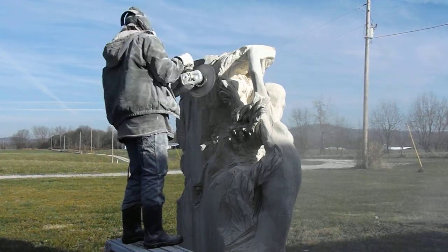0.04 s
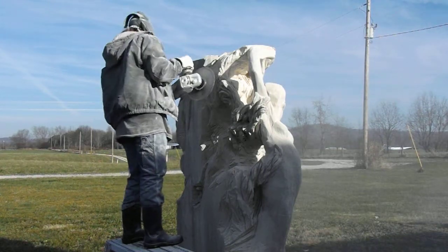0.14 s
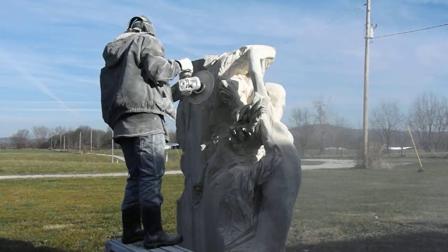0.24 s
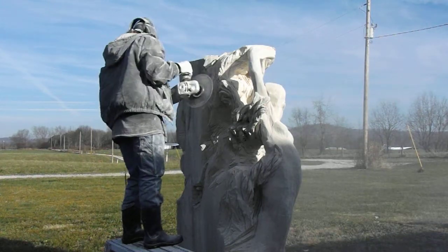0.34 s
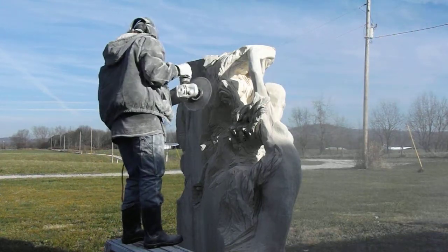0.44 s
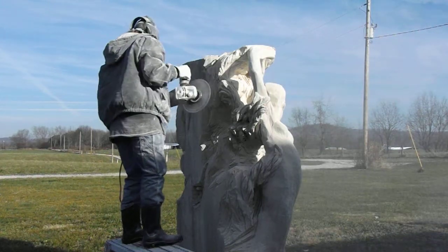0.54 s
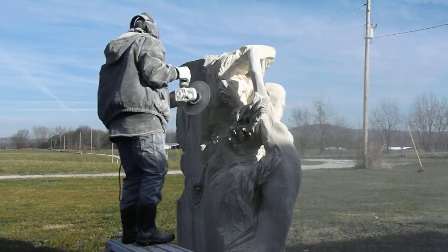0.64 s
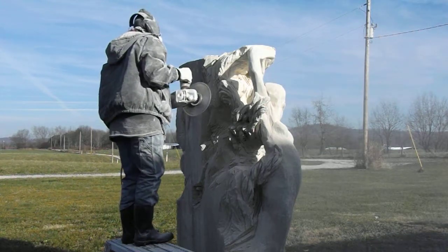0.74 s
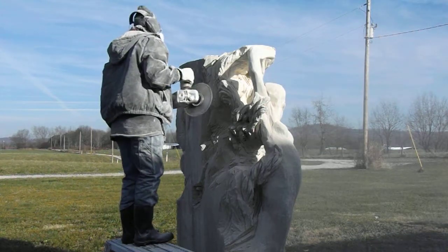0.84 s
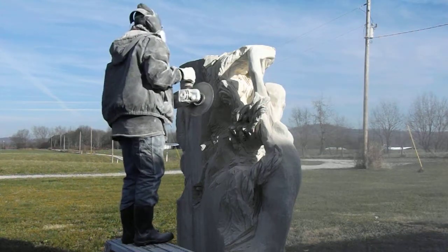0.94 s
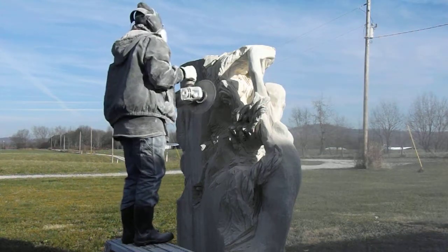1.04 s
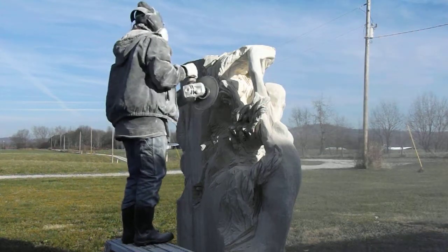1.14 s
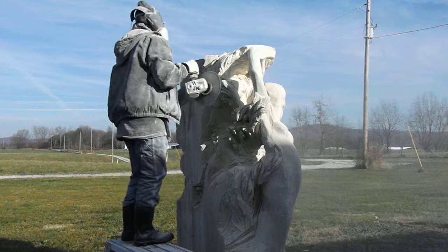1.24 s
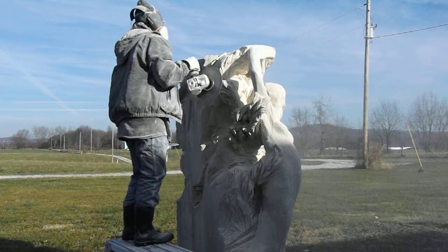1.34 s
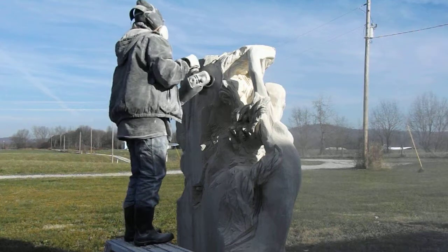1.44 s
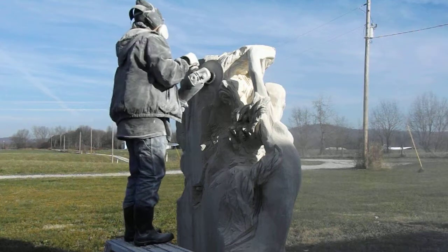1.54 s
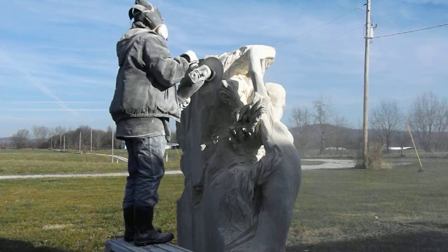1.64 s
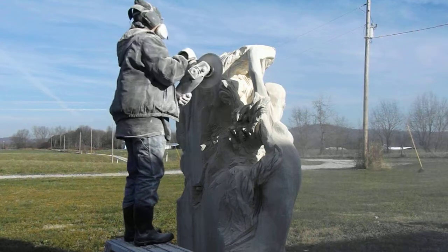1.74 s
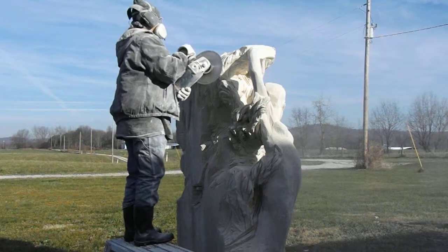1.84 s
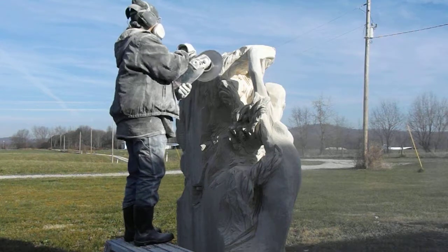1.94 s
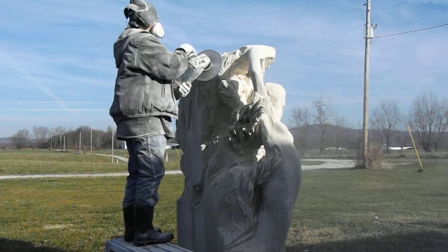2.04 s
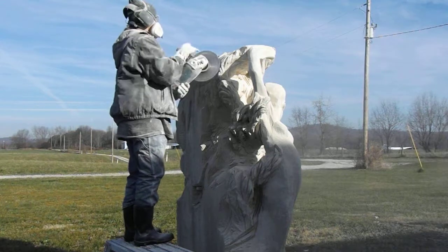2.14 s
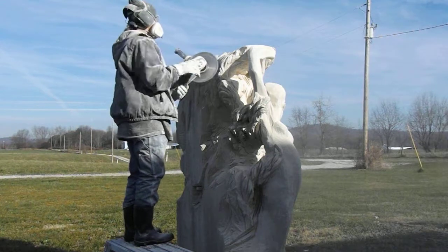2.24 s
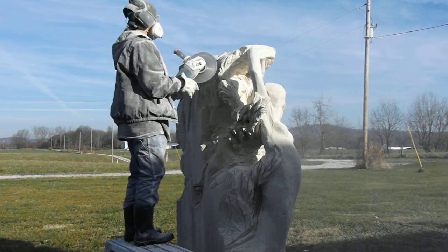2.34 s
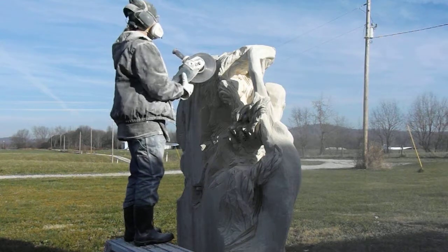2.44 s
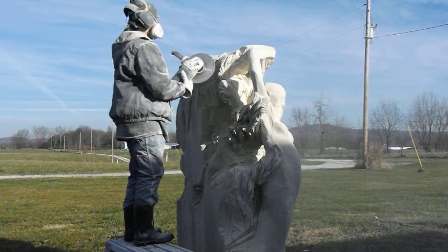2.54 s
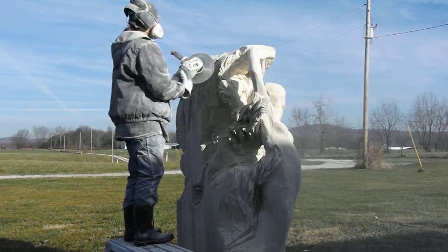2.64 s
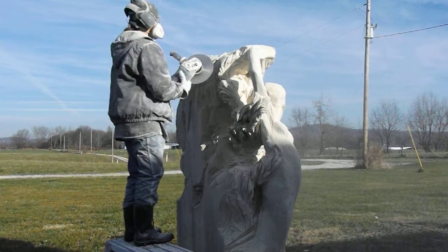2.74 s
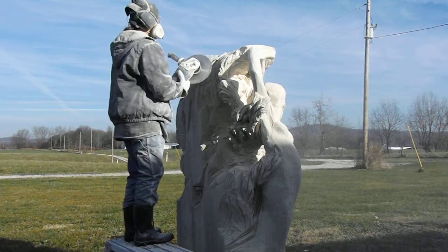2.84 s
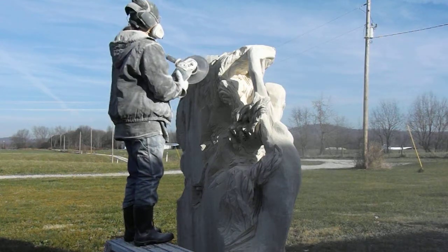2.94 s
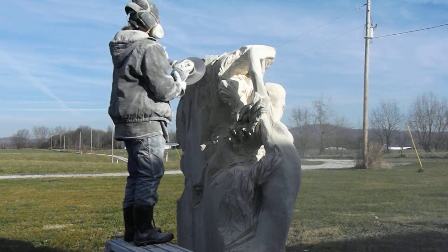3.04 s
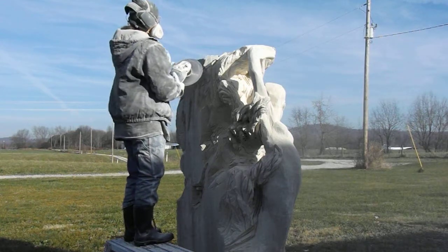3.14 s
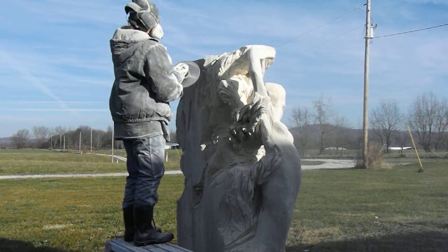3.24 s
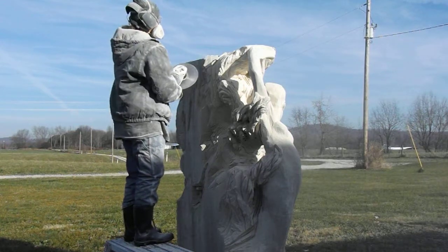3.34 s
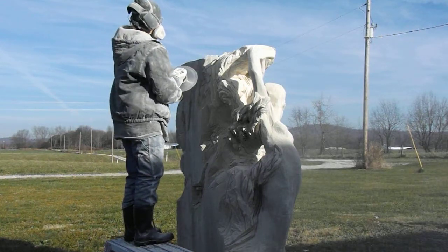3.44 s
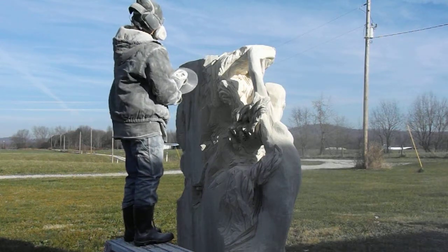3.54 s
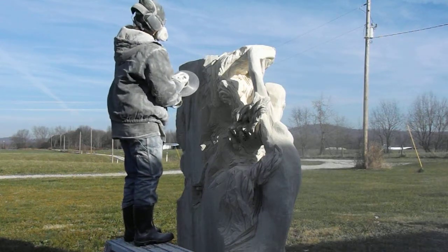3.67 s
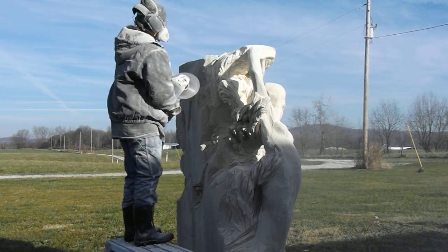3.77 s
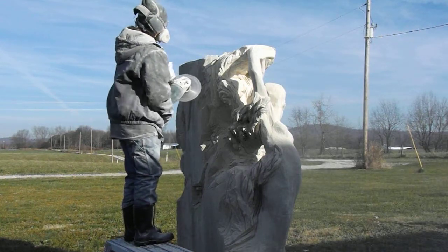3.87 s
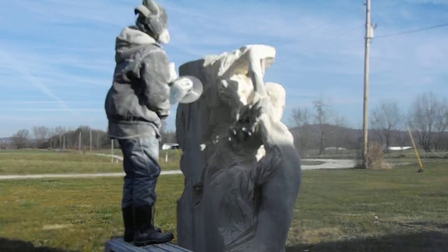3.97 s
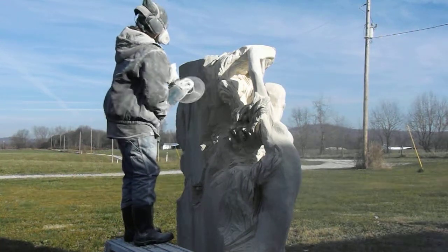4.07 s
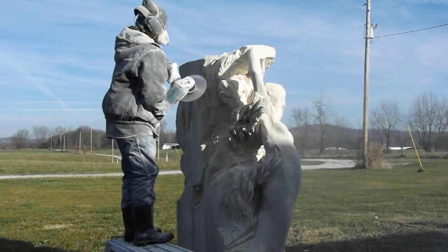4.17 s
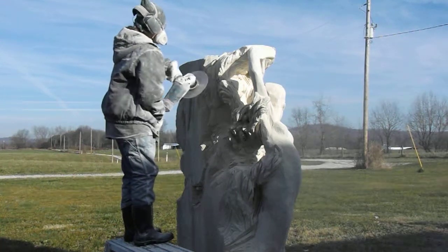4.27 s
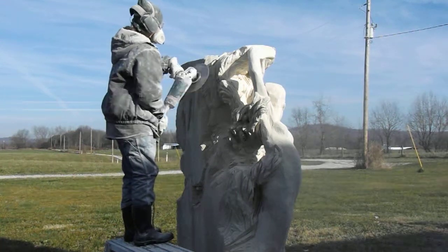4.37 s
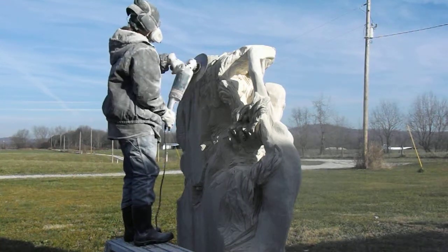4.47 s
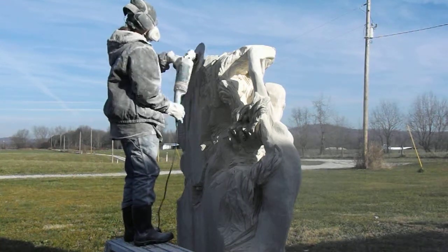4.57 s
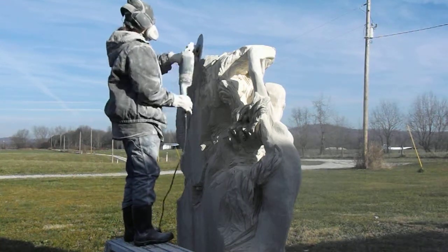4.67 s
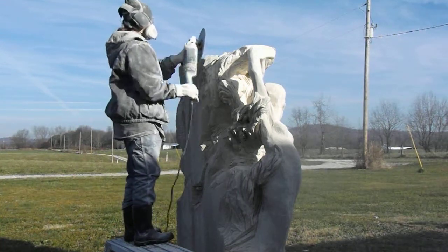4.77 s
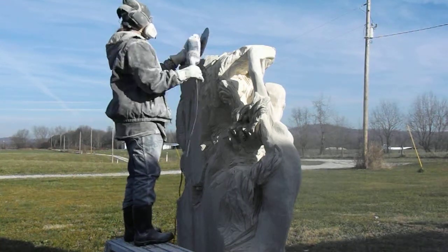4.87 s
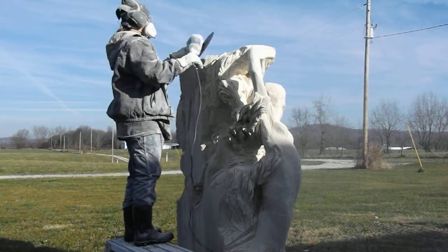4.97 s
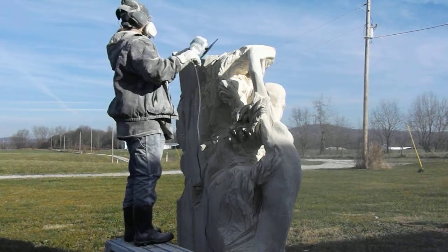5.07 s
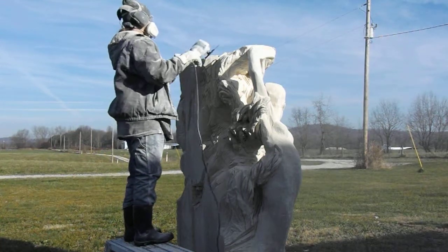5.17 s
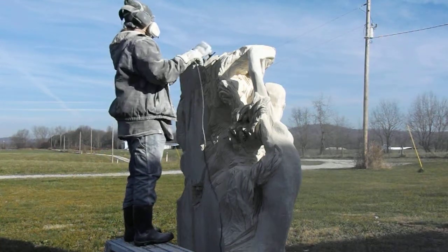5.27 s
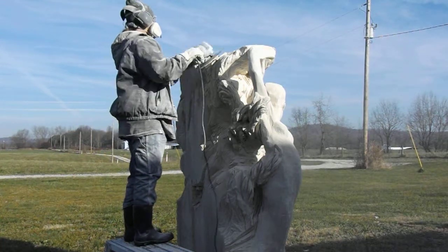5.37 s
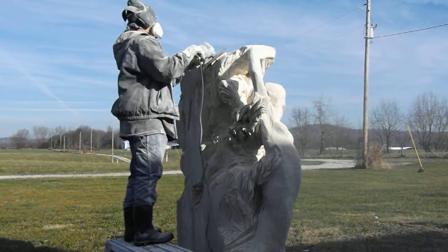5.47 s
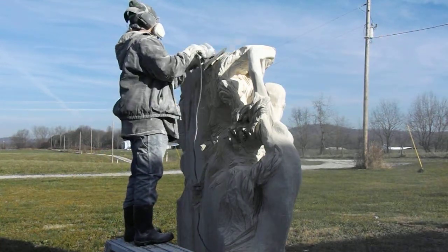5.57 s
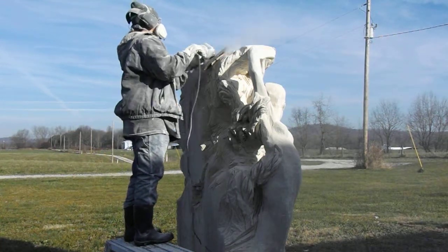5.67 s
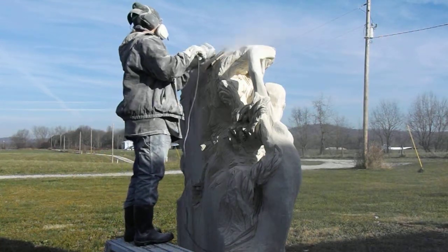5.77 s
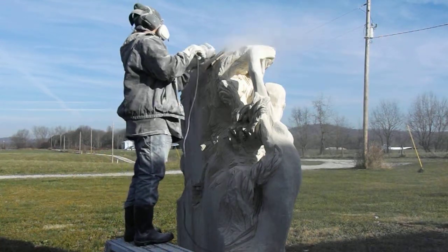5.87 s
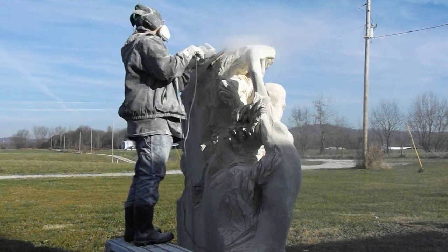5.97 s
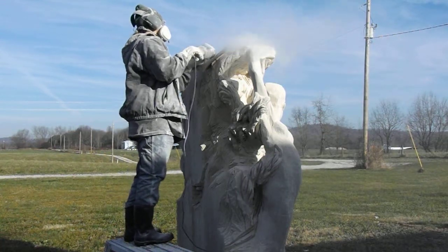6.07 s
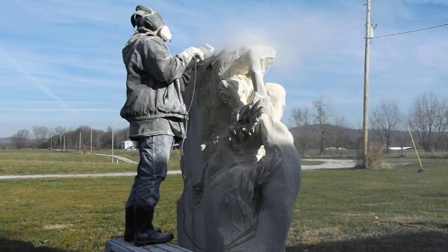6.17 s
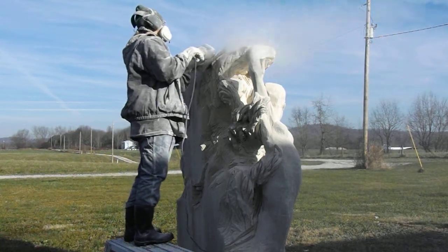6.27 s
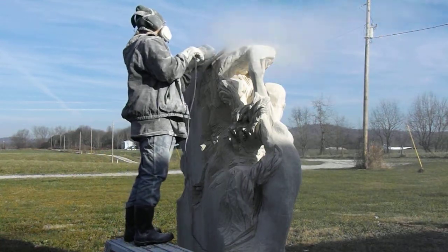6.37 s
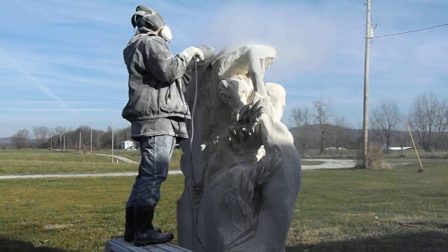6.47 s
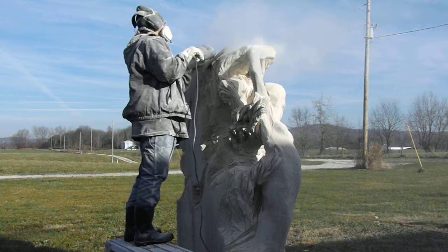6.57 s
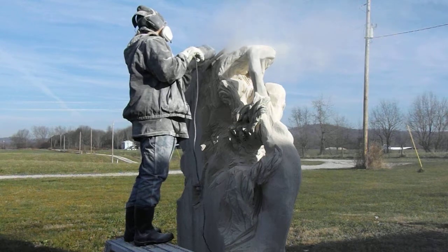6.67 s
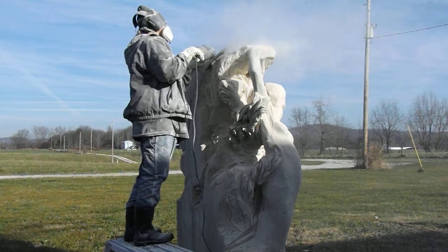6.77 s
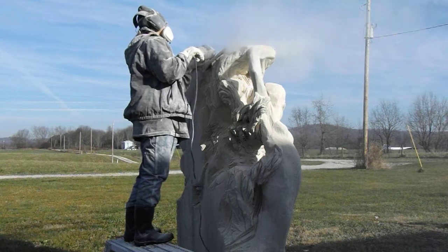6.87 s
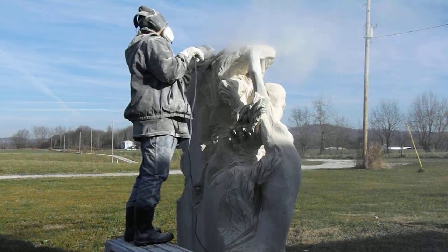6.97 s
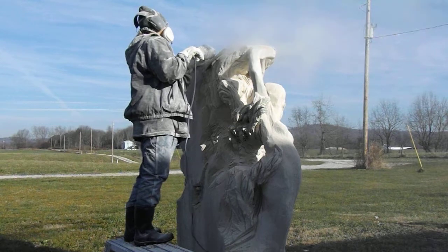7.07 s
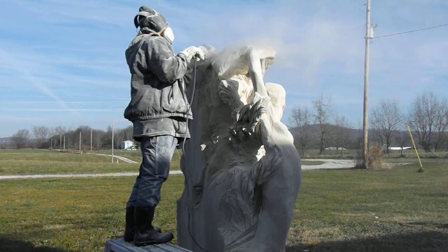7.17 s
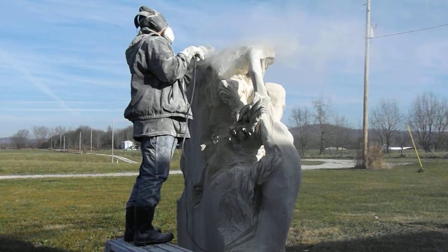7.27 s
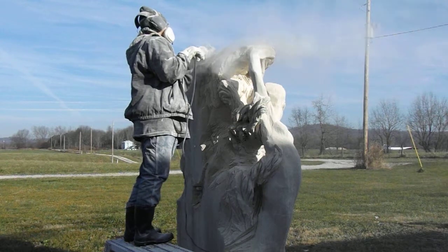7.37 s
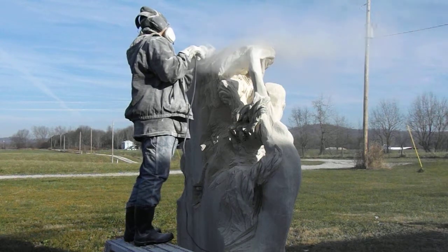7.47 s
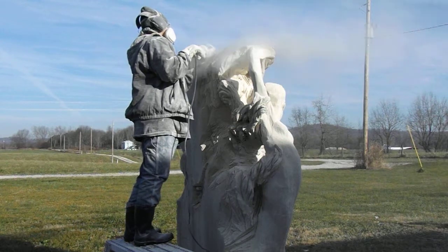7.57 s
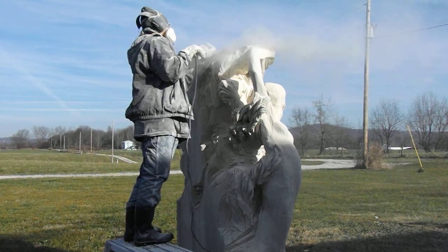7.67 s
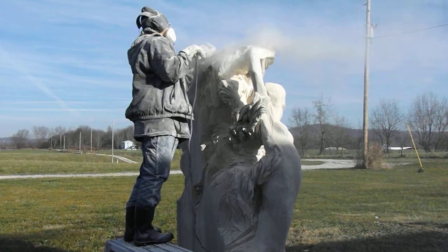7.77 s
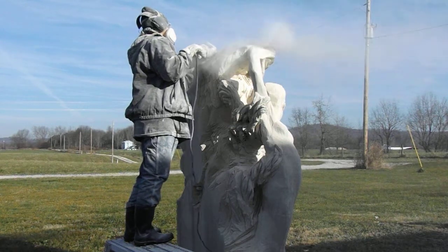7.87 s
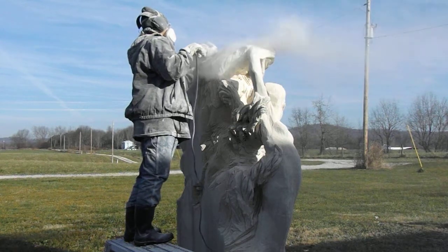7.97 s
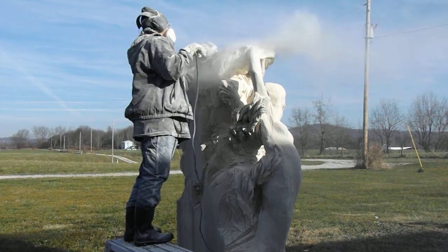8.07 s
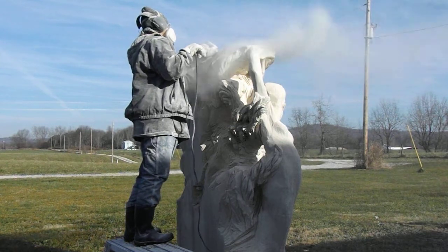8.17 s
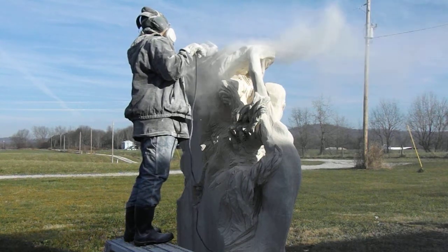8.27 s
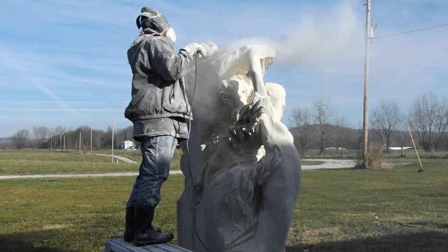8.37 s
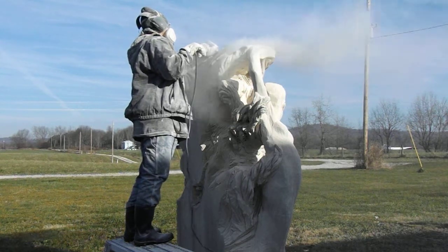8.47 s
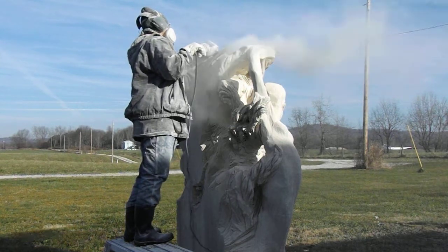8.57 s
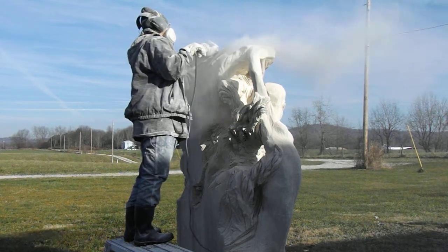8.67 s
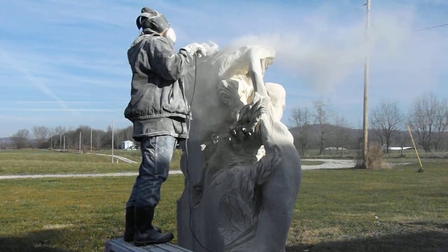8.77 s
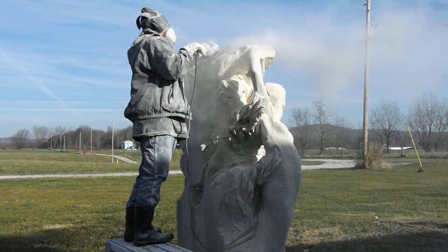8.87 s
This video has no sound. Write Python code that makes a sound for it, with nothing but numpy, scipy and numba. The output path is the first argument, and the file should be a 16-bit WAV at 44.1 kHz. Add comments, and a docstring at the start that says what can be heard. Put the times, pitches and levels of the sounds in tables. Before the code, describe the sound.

Outdoors in an open field, a large angle grinder spins free several metres from a small mono camera microphone. Its whine and rattling, airy gear roar shift as it is turned in the hands, growing quieter. Around five and a half seconds the disc touches the stone with a brief ping, then grinds loudly and harshly, ringing, chattering and cracking chips while the motor sags to a lower pitch.

```python
"""Out in a field, several metres from a carver at a stone block, recorded on a small mono camera microphone.
A large angle grinder runs free in the hands: sines for the motor whine, shaped noise for fan and gears.
Then its steel disc bites behind the block: noise turns into grinding grit and rings the disc's modes,
while the motor bogs down, chips crack off and the load throbs at multiples of the disc speed.
Wind rumbles faintly on the microphone, and a peak limiter holds the loudest moments."""
import sys
import numpy as np
from scipy import signal
from scipy.fft import rfft, irfft, next_fast_len
from scipy.io import wavfile
from scipy.ndimage import uniform_filter1d, minimum_filter1d
from numba import njit

SR = 44100
rng = np.random.default_rng(int(sys.argv[2]) if len(sys.argv) > 2 else 0)


def wav_out(sig):
    """Save sig, one row per channel (or a flat mono array), as 16-bit PCM at SR to the path in sys.argv[1]."""
    wavfile.write(sys.argv[1], SR, np.round(np.clip(np.atleast_2d(sig).T, -1, 1) * 32767).astype(np.int16))


N = 393372
TIME = np.arange(N) / SR

BITE_S = 5.452  # the disc first touches the stone
GEAR_RATIO = 4.43  # armature turns per disc turn


def undb(db):
    """Decibels to gain."""
    return 10 ** (np.asarray(db) / 20)


def columns(table):
    """Every column of a time table after the first, interpolated sample by sample."""
    s, *cols = np.transpose(table)
    return [np.interp(TIME, s, c) for c in cols]


def unit(x):
    """Scale to rms 1."""
    return x / np.sqrt(np.mean(x ** 2))


def colour(x, points, edges_hz=()):
    """Shape by (Hz, dB) points; split softly at the edges into bands of rms 1, lowest first."""
    size = next_fast_len(N)
    log_hz = np.log(np.arange(1, size // 2 + 2) * SR / size)
    point_hz, point_db = np.array(points).T
    spectrum = rfft(x, size) * undb(np.interp(log_hz, np.log(point_hz), point_db))
    above = [1.] + [.5 + .5 * np.tanh((log_hz - np.log(e)) * 12) for e in edges_hz] + [0.]
    return [unit(irfft(spectrum * (a - b), size)[:N]) for a, b in zip(above, above[1:])]


def walk(rate):
    """Random levels held 1 / rate seconds and smoothed twice; rms 1."""
    hold = int(SR / rate)
    steps = np.repeat(rng.standard_normal(N // hold + 1), hold)
    return unit(uniform_filter1d(uniform_filter1d(steps, hold), hold)[:N])


@njit
def svf(x, hz, width):
    """Two state-variable band-passes in a row with a moving centre, gain 1 there."""
    y, b, l, c, m = np.empty(len(x)), 0., 0., 0., 0.
    for i in range(len(x)):
        g, k = np.tan(np.pi * hz[i] / SR), width / hz[i]
        v = (b + g * (x[i] - l)) / (1 + g * (g + k))
        w = (c + g * (k * v - m)) / (1 + g * (g + k))
        b, l, c, m, y[i] = 2 * v - b, l + 2 * g * v, 2 * w - c, m + 2 * g * w, k * w
    return y


def swells(at_s, sizes, width_s):
    """An envelope of short rounded swells centred on the given times."""
    env = np.zeros(N)
    at = (np.asarray(at_s) * SR).astype(int)
    env[at[at < N]] = np.asarray(sizes)[at < N]
    return np.clip(signal.fftconvolve(env, np.hanning(int(width_s * SR)), "same"), 0, None)


def bursts(rate, spread_db, width_s):
    """Swells at an uneven pace and of uneven size."""
    chance = rng.standard_normal((int(N / SR * rate * 1.5), 2))
    gaps = np.clip(1 + 0.2065 * chance[:, 0], .3, 2)
    return swells(np.cumsum(gaps) / rate, undb(spread_db * chance[:, 1]), width_s)


# The motor, spinning free and then loaded.
# Each row: time in seconds, armature speed in Hz.
MOTOR_SPEED = [(0, 424.2), (.9, 425.3), (1.4, 424.8), (4.6, 424.9), (5.0, 423.7), (5.55, 423.7), (6.1, 370),
               (6.3, 350), (6.6, 330), (7.0, 310), (7.45, 297), (7.9, 277), (8.92, 276)]


def armature_speed():
    """Turns per second of the armature, which sags under the load of the cut."""
    return columns(MOTOR_SPEED)[0]


# Whine reaching the microphone before the load takes over.
# Each row: time in seconds, armature tone in dB, commutator tone in dB, both rms before their wander.
WHINE_LEVELS = [(0.0, -39.5, -56), (0.28, -33.5, -47), (0.5, -36, -51), (0.9, -33.5, -46), (1.35, -35, -56),
                (1.78, -37.5, -48), (2.05, -41.5, -56), (2.38, -46, -61), (2.7, -39, -53), (3.3, -40, -56),
                (3.55, -38.5, -64), (3.95, -36.5, -61), (4.15, -35.5, -52), (4.49, -39.5, -50),
                (4.67, -48, -56), (4.85, -43, -58), (5.5, -45, -59)]
# Overtones of the armature. Each row: multiple of armature speed, mean level in dB re armature tone.
ARMATURE_OVERTONES = [(.506, -32), (3, -9), (4, -14), (7, -11), (8, -12)]
# under load the armature tone drops, then sinks on to a floor; the commutator falls silent
LOADED_S, LOADED_DB, SINK_DB_PER_S, SUNK_DB = 5.6, -54, 7, -66


def whine(hz):
    """Armature tone, its overtones and the commutator's thin whistle at thirty times the armature speed."""
    armature_db, commutator_db = columns(WHINE_LEVELS)
    loaded = np.clip((TIME - LOADED_S) / .08 + 1, 0, 1)
    sunk_db = np.maximum(LOADED_DB - SINK_DB_PER_S * (TIME - LOADED_S), SUNK_DB)
    armature_db = armature_db + loaded * (sunk_db - armature_db)
    turn = 2 * np.pi * np.cumsum(hz) / SR
    armature = undb(1.5 * walk(10)) * np.sin(turn)
    for order, db in ARMATURE_OVERTONES:
        armature = armature + undb(db + 3 * walk(25)) * np.sin(order * turn)
    commutator = (1 - loaded) * undb(commutator_db + 2 * walk(20)) * np.sin(30 * turn)
    return np.sqrt(2) * (undb(armature_db) * armature + commutator)


# The tool turning in the hands.
# Each row: time in seconds, gear roar in dB while in the open, casing hum in dB re roar.
HELD_LEVELS = [(0.0, -16, -11), (0.5, -16, -11), (1.0, -16, -10.5), (1.5, -16, -11), (2.05, -17, -8.5),
               (2.21, -19, -9.5), (2.3, -18, -9.5), (3.0, -18, -10), (3.4, -21.5, -9), (4.14, -18.5, -10.5),
               (4.45, -19, -10), (4.65, -19.5, -9.5), (5.09, -23, -9.5), (5.44, -24, -6)]
# Spectral shape of fan and gears, within each of four bands. Each row: frequency in Hz, level in dB per Hz.
ROAR_SHAPE = [(88, -80), (150, -50.5), (389, -17.5), (420, -18), (481, -22.5), (596, -9.5), (797, -11.5),
              (1250, -3), (1400, -7.5), (2280, -6), (2820, -8.5), (5780, 1), (7020, -10.5), (13100, -26.5),
              (15600, -34.5)]
# Fixed casing resonances. Each row: frequency in Hz, filter width in Hz, mean level in dB over the roar.
CASING_MODES = [(1251, 80, 0), (5000, 62, -14)]
# What shifts as the tool turns. Each row: time in seconds, low resonance in Hz, its level in dB over
# the roar, guard rattle in dB re roar.
TURNING_TOOL = [(0, 1110, -5, -14), (1.1, 1055, -3.5, -11), (1.9, 910, -8, -14), (2.4, 940, -17, -9),
                (3, 1070, -24, -16), (3.6, 1000, -45, -11), (4.0, 1070, -10, -6), (4.3, 1060, -13, -5.5),
                (4.5, 890, -3, -7), (4.8, 830, 6, -7), (5.2, 866, 7, -6.5), (5.45, 990, -3, -6)]
# The clearest knocks of gear slack. Each row: time in seconds (2.5 ms before the peak), peak in dB re roar.
GEAR_KNOCKS = [(0.2254, -14), (0.3257, -5), (0.448, 1), (0.941, -1), (1.1134, -13), (1.1662, 3),
               (1.1922, -13), (1.3959, 1), (1.4411, -15), (1.6267, -4), (2.2573, -12), (2.3156, -12),
               (2.3406, -17), (2.4808, -9), (2.5386, -6), (3.8167, 1), (4.0986, -19), (4.213, -8),
               (4.6273, -6), (4.658, -5), (4.688, 0), (4.7207, 3), (5.026, -15)]
# Modes of the sheet-metal guard. Each row: frequency in Hz, filter width in Hz, relative level in dB.
GUARD_MODES = [(3382, 200, 3), (3830, 250, -0.5), (2960, 240, -2.5), (4860, 300, 0.5)]
HIDDEN_DB = -14  # the free roar once the tool works behind the block
# shell and hiss re roar when the roar is at FACING_DB; each gains this share of what the roar
# loses as the tool turns away
FACING_DB = -16
SHELL_DB, SHELL_KEEPS = -11.5, .05
HISS_DB, HISS_KEEPS = -12.5, 0.11
RATTLE_DB, RATTLE_WANDER_DB = 2.5, 0.3  # depth of the rattle, and its slow wander


def free_running():
    """Fan air and gear mesh through the casing; slack in the gears knocks about forty times a second."""
    roar_db, hum_db = columns(HELD_LEVELS)
    away_db = FACING_DB - roar_db
    shell_db = SHELL_DB + SHELL_KEEPS * away_db
    hiss_db = HISS_DB + HISS_KEEPS * away_db
    rattle_db = RATTLE_DB + RATTLE_WANDER_DB * walk(2.83)
    low_hz, low_db, guard_db = columns(TURNING_TOOL)

    noise = rng.standard_normal(N)
    air = noise + undb(low_db) * svf(noise, low_hz, 190.0)
    for mode_hz, width_hz, db in CASING_MODES:
        air = air + undb(db + 1.5 * walk(20)) * svf(noise, np.full(N, 1. * mode_hz), 1. * width_hz)
    hum, shell, roar, hiss = colour(air, ROAR_SHAPE, edges_hz=(1430, 2500, 7000))

    slack = bursts(42, 1.8, .010)
    at_s, peak_db = np.transpose(GEAR_KNOCKS)
    knocks = swells(at_s + 0.0025, undb(peak_db), 0.0041)
    rattle = unit(1 + np.clip(undb(rattle_db) - 1, 0, 9) * slack) + knocks

    # every knock shakes the guard, which answers on its own modes
    shake = (0.25 + slack + 1.9 * knocks) * rng.standard_normal(N)
    guard = 0
    for mode_hz, width_hz, db in GUARD_MODES:
        guard = guard + undb(db) * svf(shake, np.full(N, 1. * mode_hz), 1. * width_hz)

    body = rattle * (roar + undb(shell_db) * shell)
    # hum and hiss follow the rattle more gently
    body = body + rattle ** 0.61 * (undb(hum_db) * hum + undb(hiss_db) * hiss)
    hidden_db = HIDDEN_DB * np.clip((TIME - 5.5) / .06, 0, 1)
    return (body + undb(guard_db) * unit(guard)) * undb(roar_db + hidden_db + 0.34 * walk(19))


# Gusts at the microphone. Each row: time of the peak in seconds, peak in dB before the wander.
WIND_GUSTS = [(0.03, -77), (0.2, -78), (0.74, -72), (1.07, -76), (1.54, -75), (1.86, -82), (4.65, -69),
              (4.92, -77), (6.83, -79)]
BREEZE_DB, BREEZE_FADES_DB_PER_S, GUST_S = -85, 1.6, 0.2


def wind():
    """Faint fading breeze and short gusts: low noise rumbling on the microphone."""
    rumble, = colour(rng.standard_normal(N), [(20, -14), (60, 2), (110, 6), (170, -12), (300, -38)])
    at_s, peak_db = np.transpose(WIND_GUSTS)
    breeze = undb(BREEZE_DB - BREEZE_FADES_DB_PER_S * TIME)
    return rumble * (breeze + swells(at_s, undb(peak_db), GUST_S)) * undb(3.0 * walk(7.5))


@njit
def repeat(x, lag, share):
    """Feed back what happened one turn ago."""
    y = x.copy()
    for i in range(2000, len(x)):
        k = int(lag[i])
        a = lag[i] - k
        y[i] += share * ((1 - a) * y[i - k] + a * y[i - k - 1])
    return y


# The cut behind the block. Each row: time in seconds, grinding in dB, low ring in dB re grinding,
# high ring in dB re grinding.
CUT_LEVELS = [(5.455, -13, -12, -6), (5.47, -18, -9, -9), (5.48, -13, -11, -9), (5.5, -17, -9, -8),
              (5.525, -10.5, -11, -8), (5.6, -14, -6.5, -15), (5.9, -14.5, -5.5, -13),
              (6.05, -12.5, -7.5, -14), (6.8, -13.5, -6, -15), (7.8, -14, -5, -14.5),
              (8.15, -13.5, -7.5, -14.5), (8.9, -14.5, -5.5, -14)]
# Spectral shape of the grinding dust. Each row: frequency in Hz, level in dB per Hz.
GRIT_SHAPE = [(90, -80), (150, -28.5), (480, -27), (700, -12.5), (1100, -18.5), (2200, -7.5), (3500, -3),
              (5400, -0.5), (6500, -4), (7200, -12), (9000, -24), (12000, -32), (15000, -34), (15700, -31)]
# Disc modes that glide as the rim sinks and slows. Each row: Hz at first bite, Hz when buried,
# width in Hz before widening, then relative level in dB at each of the four stages, before flaring.
DISC_RING = [(1000, 950, 64, -13, -14, -14, -17), (1240, 1225, 64, -7, -6, -6, -9),
             (1550, 1510, 64, -7, -7, -8, -10), (1865, 1870, 64, -9, -9, -8, -7),
             (2550, 2410, 68, -13, -15, -15, -8), (3180, 3040, 72, -10, -12, -11, -10),
             (3950, 3750, 72, -6, -9, -9, -9), (4340, 4150, 76, -6, -10, -10, -12),
             (4860, 4610, 76, -4, -8, -6, -3), (5150, 5130, 80, -8, -10, -11, -8),
             (5800, 5400, 150, -2, 0, -2, -1), (6300, 6050, 84, -11, -8, -8, -9),
             (6520, 6520, 84, -11, -14, -11, -14), (7700, 7550, 88, -22, -21, -18, -17),
             (8000, 7760, 92, -22, -18, -17, -18), (8300, 8270, 92, -24, -26, -19, -25),
             (9000, 8660, 96, -24, -22, -19, -16), (9260, 9280, 96, -29, -24, -22, -23),
             (9950, 9780, 96, -25, -21, -24, -23), (10250, 10250, 100, -32, -32, -28, -25),
             (10650, 10650, 100, -29, -33, -27, -24), (11000, 11030, 104, -29, -27, -31, -27),
             (11300, 11280, 104, -31, -32, -31, -24), (12050, 11730, 108, -32, -27, -30, -31),
             (12350, 12300, 108, -31, -34, -31, -28), (13250, 12810, 112, -30, -31, -29, -28),
             (13500, 13320, 112, -37, -42, -35, -34), (14250, 13930, 116, -36, -32, -29, -31),
             (14600, 14400, 116, -35, -45, -35, -36), (15300, 15000, 120, -40, -35, -34, -33)]
# Stages of the cut. One row: the four times in seconds.
RING_STAGES_S = (5.9, 6.75, 7.65, 8.4)
BURIED_S = 8.4
WIDEN = 2.19  # two band-passes in a row are narrower than each alone
FEED_WANDER_DB = -0.04  # uneven hand pressure


def cutting(hz):
    """Diamond grit tears at the stone, partly alike on each turn, and rings the disc."""
    grind_db, low_db, high_db = columns(CUT_LEVELS)
    turn_samples = GEAR_RATIO * SR / hz
    # the disc chatters against the walls of the kerf
    contact = (1 + .5 * bursts(31, 3, .022)) * (TIME > BITE_S)
    grit = contact * unit(repeat(rng.standard_normal(N), turn_samples, .3))
    dust = contact * repeat(rng.standard_normal(N), turn_samples, .2)
    depth = np.clip((TIME - BITE_S) / (BURIED_S - BITE_S), 0, 1)
    ring = 0
    for bite_hz, buried_hz, width_hz, *stage_db in DISC_RING:
        # each mode flares and fades with the shifting contact
        gain = undb(np.interp(TIME, RING_STAGES_S, stage_db) + 1.6 * walk(14))
        mode_hz = bite_hz + (buried_hz - bite_hz) * depth
        ring = ring + gain * svf(grit, mode_hz, WIDEN * width_hz)
    # the dust comes forward as the rim sinks in
    mix = unit(ring) + undb(-5 + 4.0 * depth) * colour(dust, GRIT_SHAPE)[0]
    low, mid, high = colour(mix, [(150, -20), (400, -4), (800, 0)], edges_hz=(2450, 7000))
    share = np.sqrt(1 - BITE_S * SR / N)  # each band at rms 1 while the disc cuts
    bands = mid + undb(low_db) * low + undb(high_db) * high
    return bands * share * undb(grind_db + FEED_WANDER_DB * walk(5.6))


# Chips breaking off the stone. Each row: time in seconds, peak in dB.
STONE_CHIPS = [(5.623, 0), (5.696, 0), (5.765, 1), (5.898, 1), (5.98, 1), (6.162, 3), (6.251, 1),
               (6.644, 3), (6.833, 3), (7.005, 0), (7.063, 3), (7.208, 2), (7.513, 2), (7.691, 1),
               (7.911, 2), (8.249, 2), (8.308, 2), (8.409, 1), (8.515, 2), (8.566, 1)]
TOUCH_HZ, TOUCH_DB, TOUCH_DECAY_S = 7600, -11, 0.0078  # ping of the rim at first touch


def chips():
    """Each chip is a sharp crack, a few cycles long; the first touch pings the rim."""
    crack = np.sin(2 * np.pi * 4800 * np.arange(36) / SR) * np.hanning(36)
    hits = np.zeros(N)
    for s, db in STONE_CHIPS:
        hits[int(s * SR) - 18] = undb(db)  # half a crack early, to centre it
    t = np.clip(TIME - BITE_S, 0, None)
    ping = np.sin(2 * np.pi * TOUCH_HZ * t) * (1 - np.exp(-t / 0.0011)) * np.exp(-t / TOUCH_DECAY_S)
    return np.convolve(hits, crack)[:N] + undb(TOUCH_DB) * ping


# Throb of the loaded disc. Each row: multiple of disc speed, mean peak level in dB once the kerf grips.
THROB_ORDERS = [(2, -84), (3, -72), (4, -70), (5, -62), (6, -62), (8, -57), (9, -54), (11, -49), (12, -49),
                (14, -46), (15, -46)]
GRIPPED_S, GRIP_DB_PER_S = 7.77, 5.5  # the throb grows until the kerf grips
BOG_ORDER, BOG_DB = 8, -41


def throb(hz):
    """Drag of the disc at multiples of its speed, one of which stands out as it bogs down."""
    disc_turn = 2 * np.pi * np.cumsum(hz) / SR / GEAR_RATIO
    drag = 0
    for order, db in THROB_ORDERS:
        drag = drag + undb(db + 3 * walk(8)) * np.sin(order * disc_turn)
    grip = undb(GRIP_DB_PER_S * np.minimum(TIME - GRIPPED_S, 0)) * (TIME > BITE_S)
    bogging = np.interp(TIME, (5.55, 5.65, 6.05, 6.2), (0, 1, 1, 0))
    bog = undb(BOG_DB + 2 * walk(12)) * bogging * np.sin(BOG_ORDER * disc_turn)
    return drag * grip + bog


def scene():
    """All sources reach one microphone, copied to two equal channels."""
    hz = armature_speed()
    free = whine(hz) + free_running() + wind()
    cut = cutting(hz) + chips() + throb(hz)
    return np.tile(free + cut, (2, 1))


@njit
def follow(x, top, release):
    """Peak follower that jumps up at once and creeps back to the threshold."""
    y, e = np.empty(len(x)), top
    for i in range(len(x)):
        e = max(abs(x[i]), e + (top - e) * release)
        y[i] = e
    return y


LIMIT = .75  # peak level where limiting starts, full scale 1
RELEASE_S = .025
NOTCH_HZ, NOTCH_WIDTH_HZ = 7000, 70
TOP_HZ = 15725


def record(dry):
    """Peak limiter, a narrow notch and the steep top cut of the camera."""
    mono = dry[0]
    # the power below 1 lets part of each peak through
    gain = (LIMIT / follow(mono, LIMIT, 1 / (RELEASE_S * SR))) ** .7
    gain = minimum_filter1d(gain, size=80)  # duck slightly ahead of each peak
    for _ in range(3):
        gain = uniform_filter1d(gain, size=40)
    x = signal.lfilter(*signal.iirnotch(NOTCH_HZ, NOTCH_HZ / NOTCH_WIDTH_HZ, SR), gain * mono)
    x = signal.sosfilt(signal.ellip(14, .2, 95, TOP_HZ, fs=SR, output="sos"), x)
    return np.tile(x / max(1, np.abs(x).max()), (2, 1))


dry = scene()
out = record(dry)
wav_out(out)
```